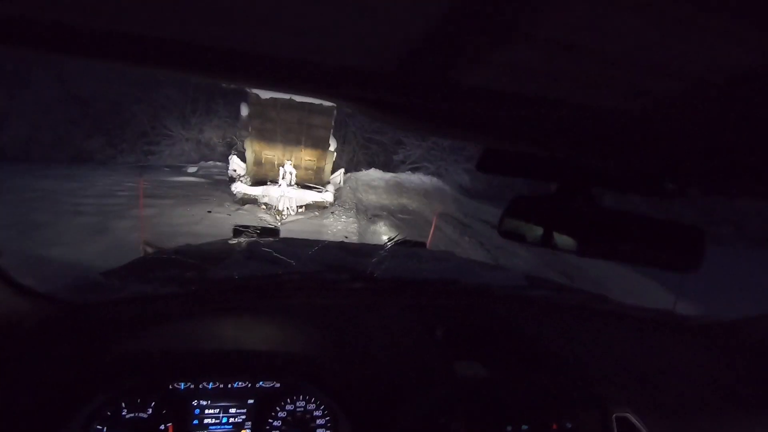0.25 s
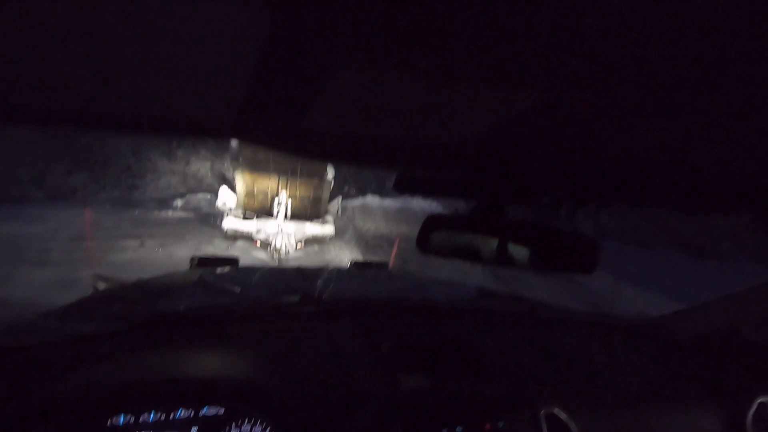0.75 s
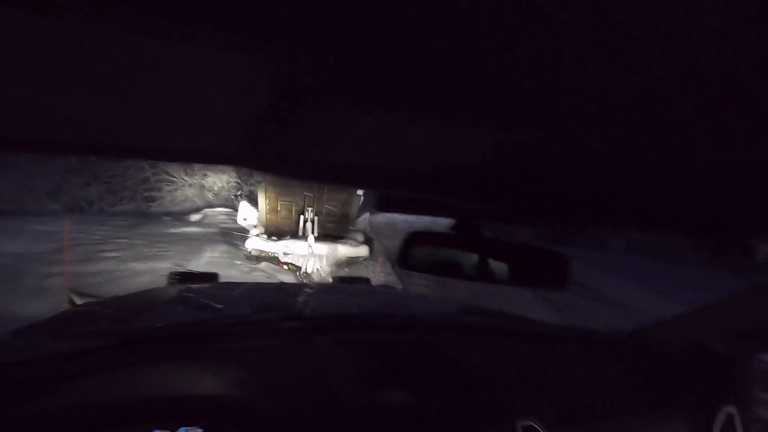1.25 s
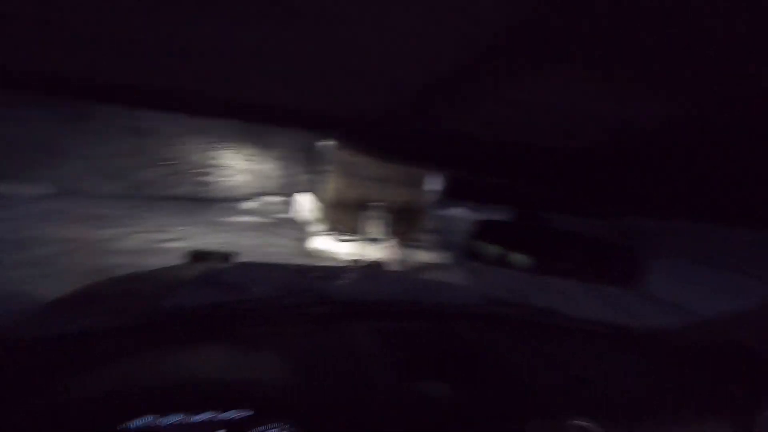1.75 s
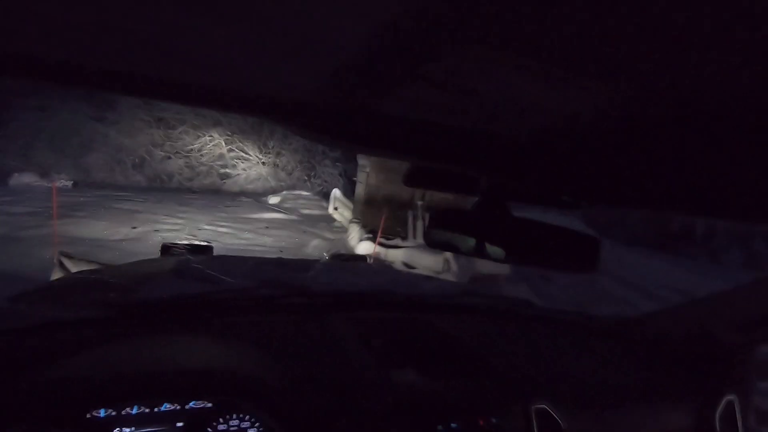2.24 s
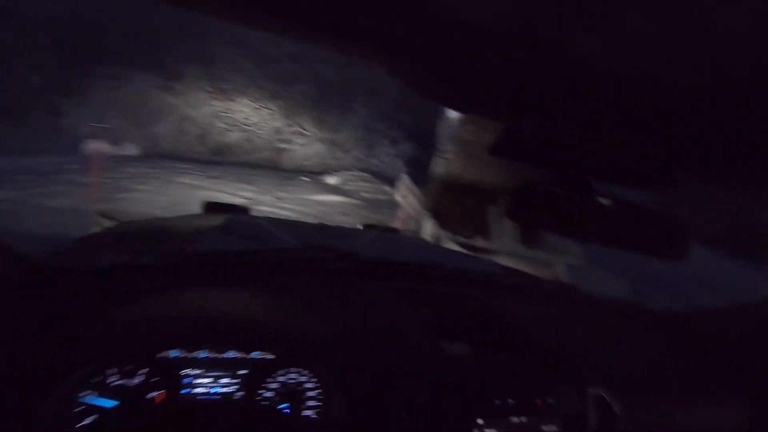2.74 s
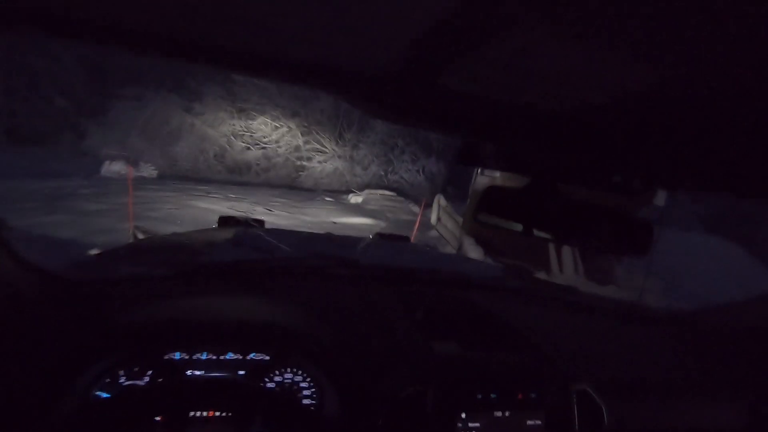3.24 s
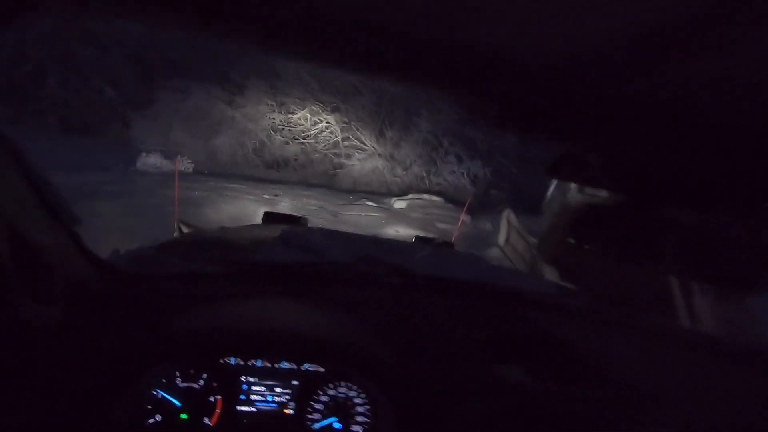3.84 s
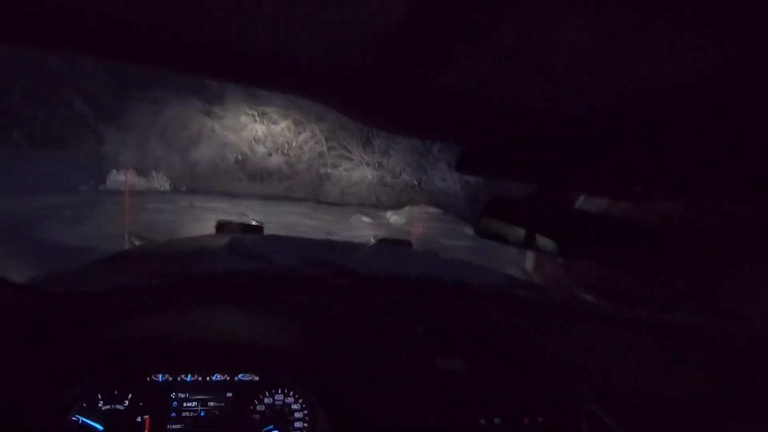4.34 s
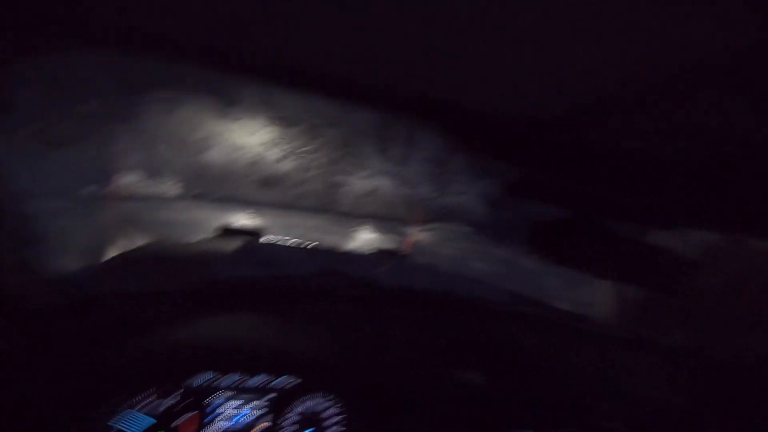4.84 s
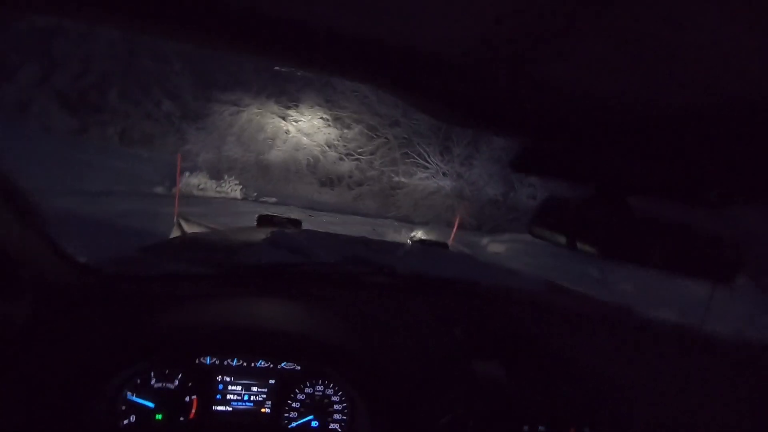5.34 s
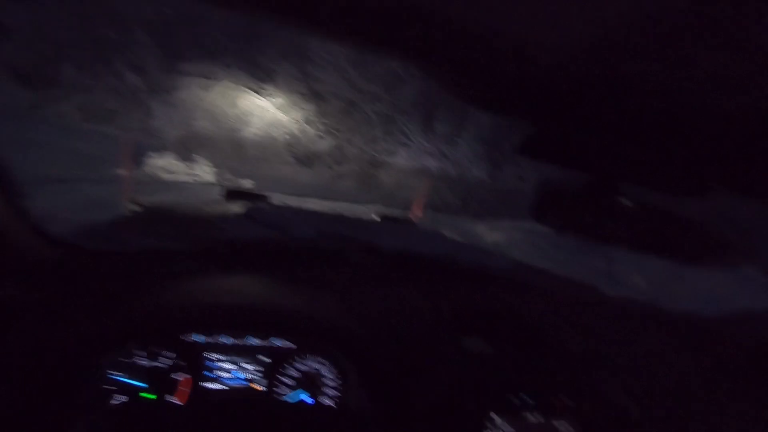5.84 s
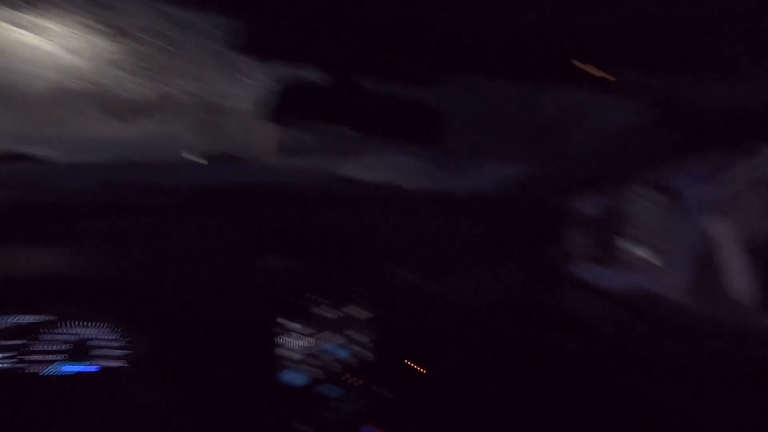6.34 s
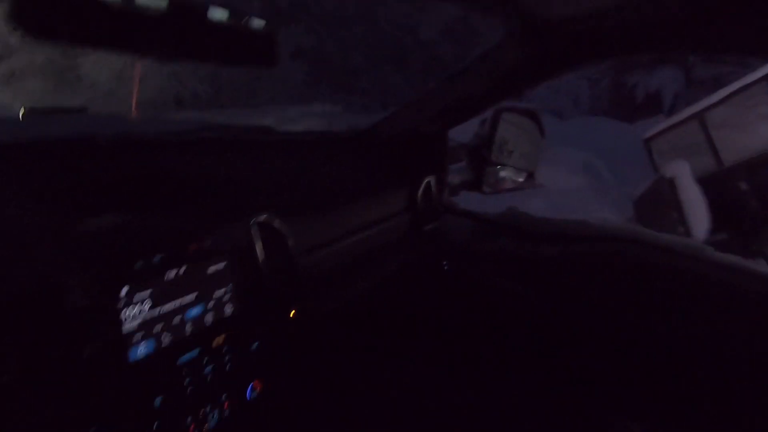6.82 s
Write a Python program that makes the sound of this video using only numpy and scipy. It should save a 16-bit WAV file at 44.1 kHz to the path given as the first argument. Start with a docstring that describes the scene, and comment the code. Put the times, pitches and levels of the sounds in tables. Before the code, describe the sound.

Inside a diesel truck cab crawling over rough frozen ground: deep rumble, dull floor thuds, low air booms and constant rattling of loose plastic trim.

```python
"""Rumble and trim rattle throughout, with thuds and air booms among them: the cab of a diesel truck
crawling over rough, frozen ground at night. Filtered noise makes the body rumble, engine drone and
rattle. Decaying sines make the floor thuds, panel knocks, small ticks, loose taps and key jingles.
Sagging low sines make the air booms; late on, noise slips through one resonance as a rub."""
import sys
import numpy as np
from scipy import signal
from scipy.fft import rfft, irfft, next_fast_len
from scipy.io import wavfile
from scipy.ndimage import uniform_filter1d, map_coordinates

SR = 44100
rng = np.random.default_rng(int(sys.argv[2]) if len(sys.argv) > 2 else 0)


def unload_wav(signal):
    """Save mono or channel-first audio to the path in sys.argv[1] as 16-bit WAV at rate SR, clipped to [-1, 1]."""
    wavfile.write(
        sys.argv[1],
        SR,
        np.round(np.clip(np.atleast_2d(signal).T, -1, 1) * 32767).astype(np.int16),
    )


N = 312228
T = np.arange(N) / SR

# Engine bay and blower spectrum. Each row: frequency in Hz, relative density in dB per Hz.
DRONE_SPECTRUM = [(180, -47.5), (300, 10), (435, -9), (838, -4), (987, 4.5), (1370, -19.5), (3150, -21.5),
                  (8040, -36.5), (10500, -59.5), (22000, -120)]
DRONE_LEVEL_DB = -50

# Road and engine rumble between bumps. Each row: time in seconds, level in dB.
RUMBLE_LEVEL = [(0, -11.5), (.2, -19.5), (1.0, -16), (1.45, -15), (1.8, -19.5), (2.5, -23.5), (3.0, -18.5),
                (3.4, -20), (4.06, -21), (4.5, -16.5), (5.0, -22), (5.7, -22), (6.4, -19), (7.08, -23.5)]
# Rumble spectrum. Each row: frequency in Hz, relative density in dB per Hz.
RUMBLE_SPECTRUM = [(12, -59.5), (20, -1.5), (38, 3.5), (55, -1), (81, -6.5), (162, -8.5), (215, -12.5),
                   (414, -31.5), (600, -39.5), (780, -57.5), (1320, -120)]
# Floor pan and seat frame spectrum. Each row: frequency in Hz, relative density in dB per Hz.
JOLT_SPECTRUM = [(30, -38.5), (70, -5.5), (120, 1.5), (200, -5), (320, -11.5), (550, -20.5), (900, -32.5),
                 (1500, -120)]
# Hard bumps ringing the body. Each row: start in seconds, level before the soft rise in dB, pitch in Hz.
THUDS = [(0.329, -8.5, 146), (1.01, -14.5, 147), (1.146, -11.5, 146), (1.346, -9.5, 214), (1.602, -9, 212),
         (1.815, -5.5, 133), (2.425, -8.5, 130), (2.583, -9.5, 219), (2.666, -18, 451), (2.929, -10.5, 179),
         (2.932, -12, 305), (3.301, -18, 310), (3.496, -13, 127), (3.802, -6, 264), (4.237, -4, 125),
         (4.393, -7.5, 129), (4.455, -6.5, 330), (4.614, -12.5, 109), (4.945, -15.5, 150), (5.183, -7, 133),
         (5.404, -1.5, 171), (6.126, -13, 157), (6.724, -5.5, 222.5), (6.884, -9.5, 127)]
THUD_T60_S, THUD_RISE_S = 0.073, 0.0034
# Bumps shaking trim and body. Each row: middle in seconds, level in dB, treble relative to it in dB,
# length before stretching in seconds.
BUMPS = [(0.017, -31.5, -16.5, 0.052), (0.143, -34, -26, 0.0087), (0.426, -35, -20, 0.034),
         (0.859, -35.5, -21.5, 0.025), (1.015, -33.5, -20.5, 0.057), (1.105, -38.5, -14.5, 0.02),
         (1.157, -29.5, -19, 0.01), (1.268, -37, -19, 0.04), (1.586, -31.5, -23, 0.041),
         (1.628, -28, -16.5, 0.048), (1.72, -36.5, -14, 0.066), (2.062, -38.5, -14.5, 0.02),
         (2.461, -33.5, -21, 0.046), (2.949, -21.5, -17.5, 0.026), (3.166, -43.5, -8, .02),
         (3.2, -33, -16, 0.049), (3.496, -27, -19.5, 0.031), (3.552, -23.5, -21.5, 0.041),
         (3.745, -33, -20.5, 0.047), (3.813, -29.5, -18, 0.046), (3.876, -28, -12, 0.035),
         (4.266, -31, -15.5, 0.062), (4.329, -31.5, -13, 0.018), (4.469, -27.5, -12, 0.043),
         (4.51, -26, -10, 0.089), (4.662, -26.5, -13.5, 0.032), (4.789, -35, -15, 0.038),
         (4.978, -36, -29, 0.045), (5.23, -30, -16.5, 0.07), (5.325, -37.5, -18.5, 0.056),
         (5.428, -32.5, -13, 0.059), (5.59, -31.5, -15, 0.024), (6.294, -35.5, -21, 0.049),
         (6.736, -25.5, -11.5, 0.045), (6.825, -28.5, -3.5, 0.014), (6.932, -31, -14, 0.04),
         (6.984, -43, 0, 0.017)]
# A bump jolts the body this far over the trim, for longer and a little earlier.
BODY_JOLT_DB, BODY_STRETCH, BODY_LEAD_S = 7.5, 1.57, 0.0041
TRIM_STRETCH = 0.95

# Trim rattle between bumps. Each row: time in seconds, level in dB, treble relative to it in dB.
SHAKE_LEVEL = [(0.0, -38.5, -20), (1.0, -40.5, -21.5), (1.67, -39, -15.5), (2.23, -46, -19.5),
               (2.62, -40.5, -17.5), (3.3, -46.5, -19), (3.69, -45, -12), (3.98, -48, -20.5),
               (4.3, -37.5, -10.5), (4.6, -41, -18), (4.89, -47.5, -21), (5.28, -40.5, -24),
               (5.88, -43, -15.5), (6.55, -44, -9), (6.84, -32, -23), (7.08, -58, 2)]
# Rattle spectrum. Each row: frequency in Hz, relative density in dB per Hz.
RATTLE_SPECTRUM = [(170, -26.5), (280, -0.5), (400, -5.5), (600, 0), (850, 1), (1200, -4), (2000, -12.5),
                   (3000, -18.5), (4500, -32.5), (7000, -63.5)]
# Spectrum of the treble contacts. Each row: frequency in Hz, relative density in dB per Hz.
FIZZ_SPECTRUM = [(2000, -2), (3500, -3.5), (5000, -7), (7500, -12.5), (9800, -12.5), (11000, -28),
                 (15000, -51.5)]

# Cab air heaving after bumps. Each row: middle in seconds, peak in dB, pitch at the middle in Hz.
BOOMS = [(0.201, -18, 33.7), (0.482, -16.5, 34.2), (0.7, -21, 34.7), (0.923, -17, 41), (1.111, -18, 41.5),
         (1.219, -12.5, 41.5), (1.298, -10, 37.3), (1.55, -15.5, 36.6), (1.66, -12, 34.1),
         (1.754, -7.5, 33), (2.662, -20, 36.2), (3.081, -15.5, 30.2), (3.348, -12, 34.8),
         (3.556, -13, 37.4), (3.668, -11.5, 35.8), (3.77, -17, 35.5), (3.872, -12.5, 36.4),
         (4.287, -13, 29.3), (4.684, -8.5, 41.3), (5.249, -11.5, 35), (5.461, -8.5, 40.5),
         (5.608, -13, 35.3), (6.191, -14.5, 42.9), (6.298, -19, 36), (6.561, -13, 37.4), (6.781, -12, 33.6),
         (6.927, -17.5, 37.3), (7.024, -11, 38.3)]
BOOM_RISE_S, BOOM_FALL_S, SAG_HZ_PER_S = 0.049, 0.054, 21

# Trim panel knocks. Each row: start in seconds, peak in dB.
KNOCKS = [(0.144, -17), (0.394, -26), (1.106, -26), (1.567, -16), (1.626, -22.5), (1.712, -22),
          (1.858, -28), (2.032, -31), (2.192, -32.5), (2.2976, -29), (2.93, -20.5), (2.966, -16.5),
          (3.201, -20.5), (3.479, -22.5), (3.537, -29), (4.171, -30), (4.458, -27.5), (4.494, -34.5),
          (4.951, -28.5), (5.311, -27.5), (5.726, -28), (5.762, -17.5), (6.326, -27), (6.702, -25),
          (6.895, -26)]
# Panel modes. Each row: frequency in Hz, mean level in dB, 60 dB decay in seconds.
PANEL_MODES = [(440, -3.5, 0.018), (580, -14, 0.042), (647, -4.5, 0.02), (803, -3.5, 0.036),
               (915, -0.5, 0.043), (1008, -12.5, 0.03), (1232, -5, 0.025), (1663, -8, 0.024),
               (2170, -18, 0.025), (2770, -16.5, 0.016)]
KNOCK_PAN_DB = 8  # left minus right

# Small hard parts. Each row: start in seconds, peak in dB, left minus right in dB, main ring in Hz.
TICKS = [(0.337, -36.5, -3, 2700), (0.4356, -35, -8, 2740), (0.528, -34, -1, 3030), (0.7237, -35, 8, 3800),
         (1.6993, -30, 11, 2820), (1.8176, -27, -1.5, 2930), (2.3842, -48, 9, 4500),
         (3.5317, -27.5, 5.5, 3460), (3.8177, -29, -2, 3200), (3.934, -30, 0, 3080), (3.9933, -28, 2, 3150),
         (4.2345, -29, -11, 2820), (4.7767, -32, 0, 3070), (6.0832, -43, -7, 4600), (6.1116, -41, -8, 3800),
         (6.2289, -42, 0, 4900), (6.5102, -31, -10, 3420), (6.8085, -20.5, -3, 2880)]
# Small-part modes. Each row: multiple of the main ring, mean level in dB, 60 dB decay in seconds.
CLIP_MODES = [(.63, -1, 0.0043), (0.739, 3, 0.0029), (.9, 1, 0.0051), (1.02, -1, 0.009), (1.3, 3.5, 0.0021),
              (1.751, -2.5, .003), (2.399, -17.5, 0.003)]

# A lighter loose object. Each row: start in seconds, peak in dB.
TAPS = [(1.003, -28.5), (1.154, -35), (1.223, -35.5), (1.308, -33), (4.509, -23.5), (6.7212, -25.5),
        (6.7798, -31), (6.931, -30), (6.981, -28), (7.0223, -31.5)]
# Loose-object modes. Each row: frequency in Hz, mean level in dB, 60 dB decay in seconds.
LOOSE_MODES = [(1360, 3, 0.029), (1653, -7.5, 0.023), (1813, 3.5, 0.029), (2324, -0.5, 0.032),
               (3050, -8.5, 0.022), (4240, -19, 0.0065)]

# Key contacts. Each row: start in seconds, peak in dB, left minus right in dB.
JINGLES = [(1.632, -44, 6), (1.736, -43, 3), (3.806, -40, 8), (3.865, -35.5, -3), (4.277, -50, 6),
           (4.78, -53, 8)]
# Key modes. Each row: frequency in Hz, mean level in dB, 60 dB decay in seconds.
KEY_MODES = [(6960, -5, 0.11), (7370, -7, 0.027), (7620, 1, 0.04), (7930, -2, 0.063), (10040, -1.5, 0.045)]

# Rub as the driver turns. Each row: time in seconds, level in dB.
RUSTLE_LEVEL = [(5.7, -78), (6.0, -62), (6.55, -56), (6.82, -42), (7.0, -64)]
RUSTLE_HZ, RUSTLE_WIDTH_HZ, RUSTLE_TOP_HZ = 3310, 2100, 7500

# Left-right likeness in the cab. Each row: frequency in Hz, correlation from -1 to 1.
LIKENESS = [(260, 1), (540, 0.78), (1120, 0.043), (2330, 0.44), (4840, 0.11), (10100, -0.29)]
# Microphone imbalance. Each row: frequency in Hz, left minus right in dB.
MIC_LEAN = [(60, 0.25), (200, 0.75), (500, 2), (1300, -0.5), (8000, 1)]
# Gain control: threshold, averaging time, share of the dB excess taken off.
HOLD_DB, HOLD_S, SQUEEZE = -18, 0.015, 0.38
TOP_HZ = 15600


def amp(db):
    """Decibels to gain."""
    return 10 ** (np.asarray(db) / 20)


def unit(x):
    """Scale to rms 1."""
    return x / np.sqrt(np.mean(x ** 2) + 1e-20)


def along(points, hz):
    """Interpolate (Hz, value) points on a log axis."""
    f, v = np.transpose(points)
    return np.interp(np.log(hz + 1), np.log(f + 1), v)


def curves(rows):
    """One value per sample for each column after the time."""
    s, *cols = np.transpose(rows)
    return [np.interp(T, s, c) for c in cols]


def wobble(knots_per_s):
    """A smooth random curve."""
    return map_coordinates(rng.standard_normal(N // 100), [T * knots_per_s])


def noise_pair():
    """Two unrelated white noises."""
    return rng.standard_normal((2, N))


def filtered(x, response):
    """Multiply the spectrum of x by a response of frequency."""
    m = next_fast_len(N + SR // 2)
    return irfft(rfft(x, m) * response(np.fft.rfftfreq(m, 1 / SR)), m)[..., :N]


def spread(pair, spectrum):
    """Colour two unrelated signals and mix them to the cab's left-right likeness, mid at rms 1."""
    def mid_side_gain(hz):
        turn = np.arccos(np.clip(along(LIKENESS, hz), -1, .998)) / 2
        return amp(along(spectrum, hz)) * [np.cos(turn), np.sin(turn)]

    mid, side = filtered(pair, mid_side_gain)
    return np.array([mid + side, mid - side]) / np.sqrt(np.mean(mid ** 2))


def clatter(hits_per_s, spread_db, t60_s):
    """Envelope of random contacts: sudden starts of uneven size that die fast, rms 1."""
    chance, size = rng.random(N), rng.standard_normal(N)
    hits = (chance < hits_per_s / SR) * amp(spread_db * np.tanh(size))
    return unit(signal.lfilter([1], [1, -amp(-60 / (t60_s * SR))], hits))


def swells(stretch, lead_s):
    """Power of all bumps and of their treble: quick rise, flat top, slower fall."""
    power = np.zeros((2, N))
    for s, level_db, treble_db, length_s in BUMPS:
        near = slice(max(round((s - .4) * SR), 0), round((s + .6) * SR))
        late = T[near] - s + lead_s
        steepness = np.where(late < 0, 6.5, 2.8)
        swell = amp(level_db) ** 2 / (1 + np.abs(2 * late / (stretch * length_s)) ** steepness)
        power[:, near] += swell * amp([[0], [treble_db]]) ** 2
    return power


def struck(events, modes, crack, rise_s, echo):
    """Each blow rings the modes at new strengths with a noise crack; the cab smears each side differently."""
    out, t = np.zeros((2, N + SR)), np.arange(SR // 8) / SR
    for s, db, pan_db, pitch in events:
        blow = np.zeros(len(t))
        for hz, level_db, t60_s in modes:
            decay = amp(level_db + rng.normal(0, 2.1) - 60 * t / t60_s)
            blow += decay * np.sin(2 * np.pi * pitch * hz * rng.normal(1, 0.01) * t)
        blow += crack * rng.standard_normal(len(t)) * amp(-60 * t / 0.0016)
        blow *= 1 - np.exp(-t / rise_s)  # soft contact
        blow /= np.abs(blow).max()
        tail = rng.standard_normal((2, len(t))) * amp(-60 * t / 0.072)
        tail /= np.linalg.norm(tail[0])
        wet = signal.fftconvolve(blow[None], tail, axes=1)[:, :len(t)]
        direct = amp([[pan_db / 2], [-pan_db / 2]]) * blow
        out[:, round(s * SR):][:, :len(t)] += amp(db) * (direct + echo * wet)
    return out[:, :N]


def drone():
    """Steady engine and blower noise: coloured noise with a slight level flutter."""
    return amp(DRONE_LEVEL_DB + 0.3 * wobble(51)) * spread(noise_pair(), DRONE_SPECTRUM)


def thuds():
    """Hard bumps ring the body low, as decaying sines through a soft, rubber-mounted rise."""
    out, t = np.zeros(N + SR), np.arange(SR // 4) / SR
    rise = 1 - np.exp(-t / THUD_RISE_S)
    for s, level_db, hz in THUDS:
        ring = amp(level_db - 60 * t / THUD_T60_S) * np.sin(2 * np.pi * hz * t)
        out[round(s * SR):][:len(t)] += rise * ring
    return out[:N]


def body():
    """Lumpy noise rumbles through the floor, jolts at each bump, and the thuds ring on top."""
    level_db, = curves(RUMBLE_LEVEL)
    lumps = amp(2.9 * wobble(18))
    rumble = amp(level_db) * spread(lumps * noise_pair(), RUMBLE_SPECTRUM)
    jolt_gain = amp(BODY_JOLT_DB) * np.sqrt(swells(BODY_STRETCH, BODY_LEAD_S)[0])
    jolts = jolt_gain * spread(lumps * noise_pair(), JOLT_SPECTRUM)
    return rumble + jolts + thuds()


def shaking():
    """Gains of the rattle and of its treble: slow shake plus a short swell at each bump."""
    db, treble_db = curves(SHAKE_LEVEL)
    return np.sqrt(amp([db, db + treble_db]) ** 2 + swells(TRIM_STRETCH, 0))


def patchy(pair, depth_db):
    """Parts of the trim take turns: patches of random gain in time and pitch."""
    z = signal.stft(pair, nperseg=512)[2]
    field = uniform_filter1d(rng.standard_normal(z.shape[1:]), size=4, axis=0)  # across pitch
    field = uniform_filter1d(field, size=7, axis=1)  # across time
    return signal.istft(z * amp(depth_db * unit(field)), nperseg=512)[1][:, :N]


def grains(spectrum, cycles, spread_db, pan_db, count):
    """Many tiny rings at random times and pitches, each with its own pan and side delay, rms 1."""
    when, where = rng.random(count), rng.random(count)
    size, side, lag = rng.standard_normal((3, count))
    low_hz, high_hz = spectrum[1][0], spectrum[-2][0]
    hz = low_hz * (high_hz / low_hz) ** where
    step = np.arange(768)
    turns = step / SR * hz[:, None]
    ring = np.sin(2 * np.pi * turns) * amp(-60 * turns / cycles) * (1 - np.exp(-turns))
    ring *= (amp(along(spectrum, hz) + spread_db * size) * hz)[:, None]  # short high grains need more height
    out = []
    for sign in (1, -1):
        start = np.clip(when * N + sign * lag * 0.00021 * SR, 0, N).astype(int)
        panned = ring * amp(sign * pan_db * where * side)[:, None]
        places = start[:, None] + step
        out.append(np.bincount(places.ravel(), panned.ravel(), N + SR)[:N])
    return unit(np.array(out))


def rattle(low_gain, high_gain):
    """Loose trim chatters: small rings over a rough noise smear, and a fizz with added shorter contacts."""
    chatter = clatter(hits_per_s=120, spread_db=8.5, t60_s=0.067)
    smear = spread(patchy((0.91 + chatter) * noise_pair(), depth_db=2.0), RATTLE_SPECTRUM)
    rings = grains(RATTLE_SPECTRUM, cycles=25.0, spread_db=0.0, pan_db=3.0, count=3400)
    contacts = 1.1 + chatter + 0.42 * clatter(hits_per_s=230, spread_db=8.0, t60_s=0.021)
    fizz = spread(contacts * patchy(noise_pair(), depth_db=3.0), FIZZ_SPECTRUM)
    return low_gain * (amp(-4.0) * smear + amp(-13.0) * rings) + high_gain * fizz


def boom():
    """Cab air heaves at its lowest resonance after a bump: a sine that swells, fades and sags in pitch."""
    out, t = np.zeros(N + SR), np.arange(-SR // 4, SR // 4) / SR
    shape = np.exp(-.5 * (t / np.where(t < 0, BOOM_RISE_S, BOOM_FALL_S)) ** 2)
    for (s, db, hz), turn in zip(BOOMS, rng.random(len(BOOMS))):
        phase_turns = turn + hz * t - SAG_HZ_PER_S * t ** 2 / 2
        out[round(s * SR):][:len(t)] += amp(db) * shape * np.sin(2 * np.pi * phase_turns)
    return out[SR // 4:][:N]  # puts t = 0 on the listed middle


def knocks():
    """A trim panel, louder on the left, is struck and rings its short modes."""
    blows = [(s, db, KNOCK_PAN_DB, 1) for s, db in KNOCKS]
    return struck(blows, PANEL_MODES, crack=.03, rise_s=0.00037, echo=1.0)


def ticks():
    """Small hard parts click, each ringing multiples of its own main pitch."""
    return struck(TICKS, CLIP_MODES, crack=0.06, rise_s=0.00045, echo=1.0)


def taps():
    """A lighter loose object taps and rings its modes, centred."""
    blows = [(s, db, 0, 1) for s, db in TAPS]
    return struck(blows, LOOSE_MODES, crack=.05, rise_s=0.00091, echo=1.0)


def jingle():
    """Keys touch now and then, ringing high metal modes."""
    return struck([(*row, 1) for row in JINGLES], KEY_MODES, crack=0.093, rise_s=0.0037, echo=0.59)


def rustle():
    """Cloth or a strap drags over plastic: uneven noise slips in one resonance."""
    level_db, = curves(RUSTLE_LEVEL)
    slips = clatter(hits_per_s=170, spread_db=8.0, t60_s=0.028) * noise_pair()

    def resonance(hz):
        peak = 1j * hz / (RUSTLE_HZ ** 2 - hz ** 2 + 1j * hz * RUSTLE_WIDTH_HZ)
        return peak / (1 + 1j * hz / RUSTLE_TOP_HZ) ** 4

    return amp(level_db) * (T > RUSTLE_LEVEL[0][0]) * unit(filtered(slips, resonance))


def scene():
    """All sources as they reach the two microphones."""
    steady = drone() + body() + rattle(*shaking())
    blows = knocks() + ticks() + taps() + jingle()
    return steady + boom() + blows + rustle()


def record(dry):
    """Gain control eases loud moments, the microphones lean apart in level, and the band is cut at the top."""
    share = 1 / (HOLD_S * SR)
    loud = np.sqrt(signal.lfilter([share], [1, share - 1], dry.mean(0) ** 2))
    held = dry * np.maximum(loud / amp(HOLD_DB), 1) ** -SQUEEZE

    def microphones(hz):
        return amp(along(MIC_LEAN, hz) / 2 * np.array([[1], [-1]])) * (hz < TOP_HZ)

    return filtered(held, microphones)


dry = scene()
out = record(dry)
unload_wav(out)
```